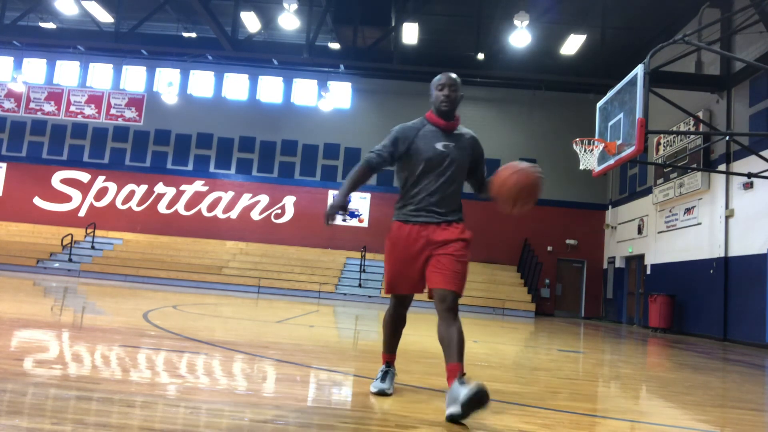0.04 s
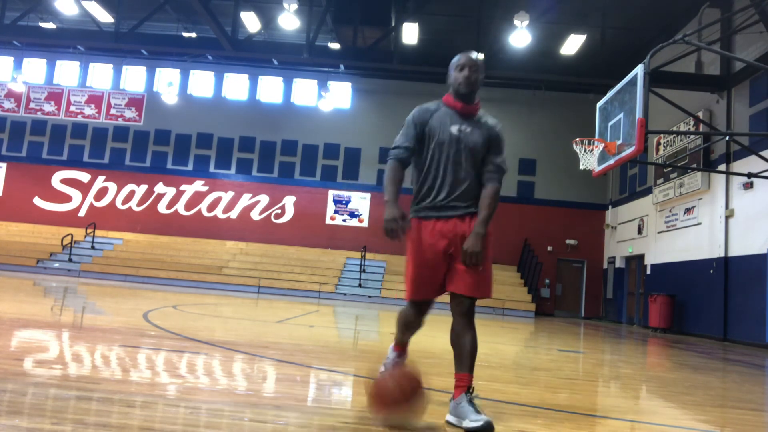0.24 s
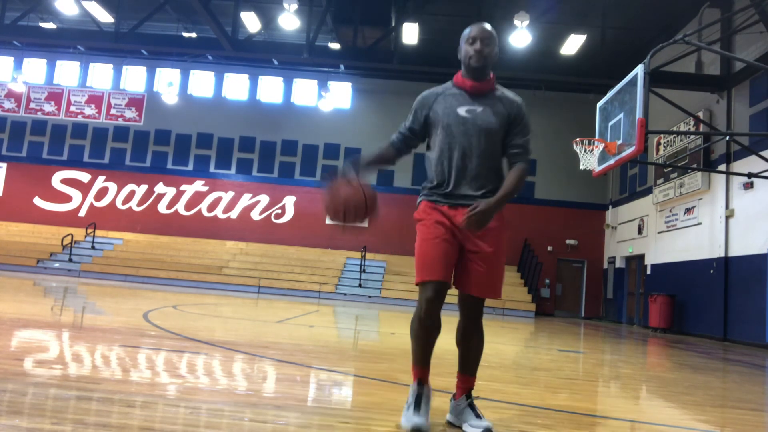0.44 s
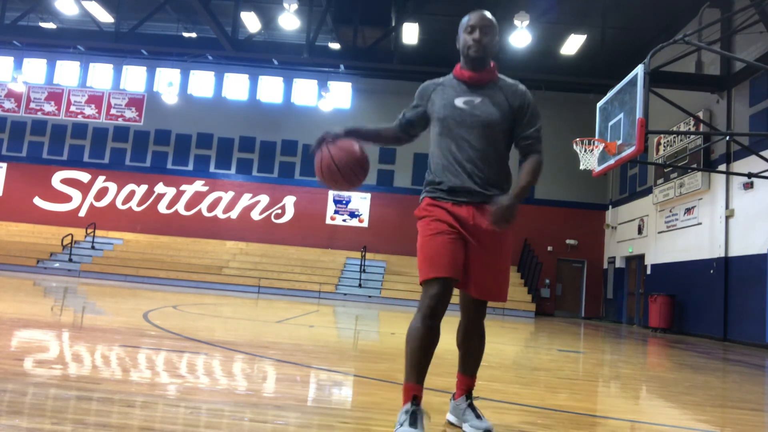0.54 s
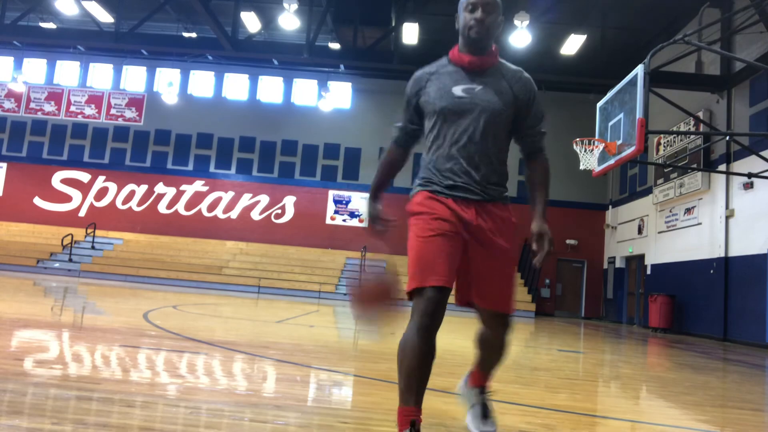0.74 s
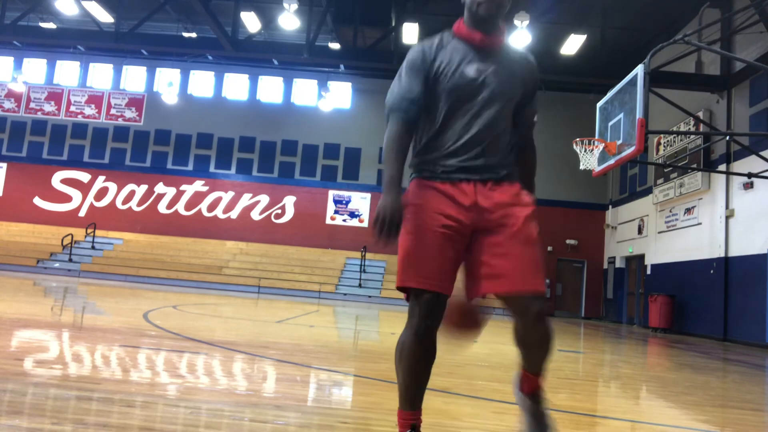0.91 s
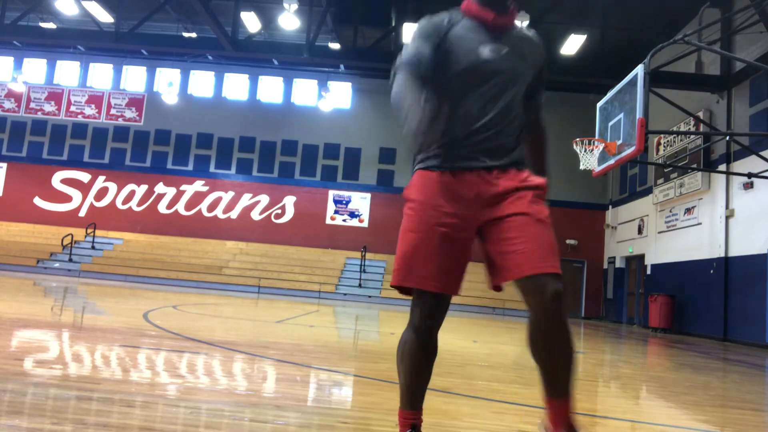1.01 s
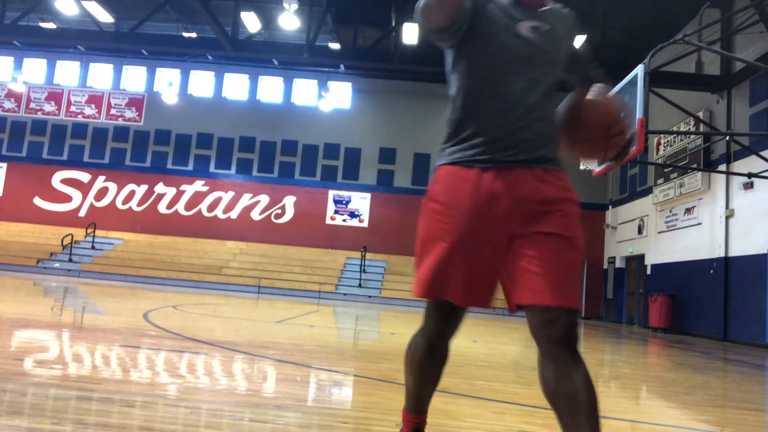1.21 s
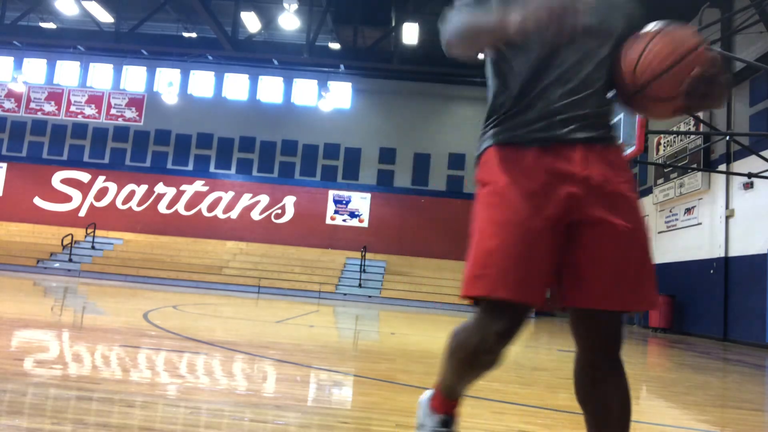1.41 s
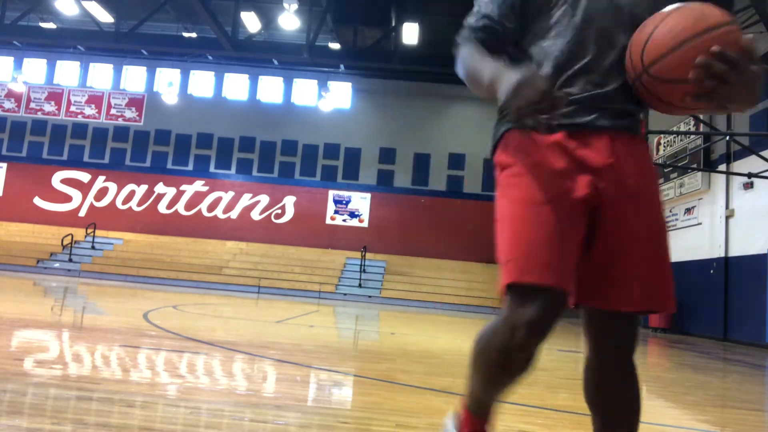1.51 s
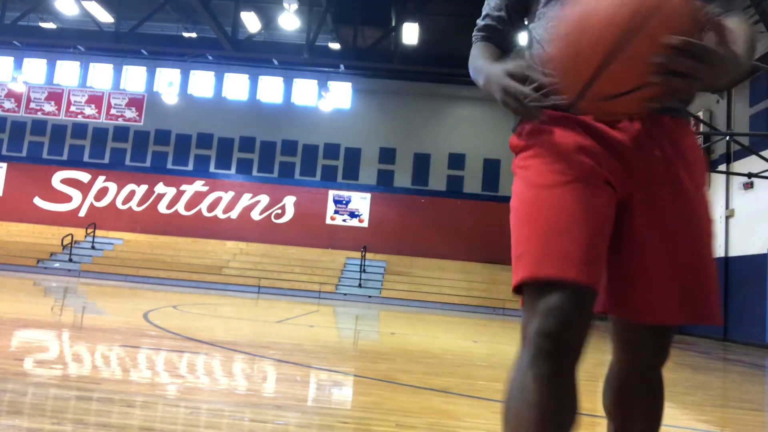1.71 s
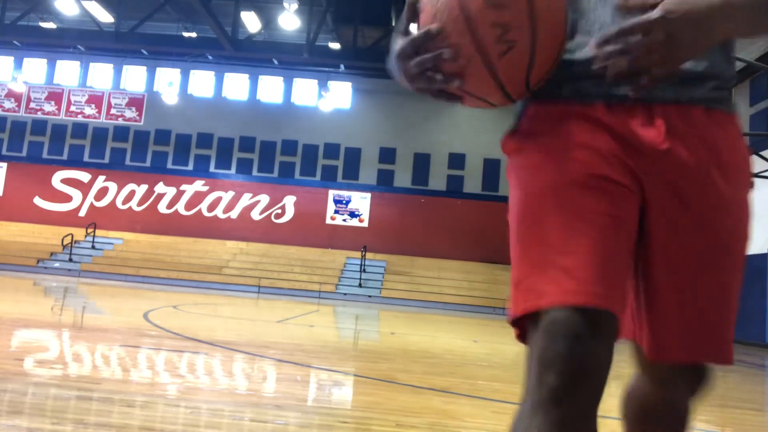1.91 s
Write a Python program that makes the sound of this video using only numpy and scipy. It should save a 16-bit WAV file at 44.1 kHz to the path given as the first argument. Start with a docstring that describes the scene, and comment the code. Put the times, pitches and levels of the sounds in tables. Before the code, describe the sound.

A basketball bounces twice on a wooden gym floor close to the microphone, each slap and thump setting off a brief rattle. The large hall echoes while soft footsteps approach with a faint rustle of clothes.

```python
"""A big gym with a sprung wooden floor; the microphone is on a camera standing on the boards, close
to a basketball. The hall is still ringing from an earlier bounce when the ball lands, at 0.24 s and
again at 0.82 s. Each bounce is a sharp slap of rubber, a falling thump through the floor and a swelling
ring of the boards, and it sets the camera's stand rattling. The hall rings on over its ventilation
while the player walks up with soft steps, rustling clothes and light touches on the ball."""
import sys
import numpy as np
from scipy import signal
from scipy.fft import rfft, irfft, next_fast_len
from scipy.io import wavfile
from scipy.ndimage import map_coordinates

SR = 44100
rng = np.random.default_rng(int(sys.argv[2]) if len(sys.argv) > 2 else 0)


def int16_out(signal):
    """Quantize to a 16-bit WAV file."""
    q = np.round(np.clip(np.atleast_2d(signal).T, -1, 1) * 32767)
    wavfile.write(sys.argv[1], SR, q.astype(np.int16))


N = 85995
T = np.arange(N) / SR

# The ball lands near the microphone. Each row: start in seconds, shell level in dB, shell tilt in dB per
# octave, crack level in dB, crack's upper edge in Hz, then thump, boards and hall levels in dB.
BOUNCES = [(0.239, -1.5, -1.5, -8, 19100, -9.5, -20.5, 4), (0.8161, -8.5, 6.5, -12, 9700, -10.5, -26.5, 1)]
# A bounce heard only as hall sound. It holds: start in seconds, hall level in dB.
EARLIER_BOUNCE = (-0.31, 0)
# The ball's shell, then the faint ping of the air in it. Each row: pitch in Hz, level in dB, T60 in seconds.
SHELL_MODES = [(1062, -15, 0.04), (1239, -3, 0.016), (1720, -12.5, 0.019), (1900, -16, .012),
               (2248, -4, 0.013), (3400, -18, 0.014)]
PING_MODES = [(943, -42, 0.3), (1315, -41.5, .35), (1670, -37.5, 0.25), (2310, -45, .4),
              (2746, -44.5, 0.16)]
# Rubber striking varnish. Each row: frequency in Hz, level in dB.
CRACK_SPECTRUM = [(500, -44), (1000, 13.5), (2300, 6), (2850, -20.5), (3400, 6), (4300, 0), (6500, 1.5),
                  (8500, -6), (13000, -2), (16000, -18.5)]
CLICK_DB, CLICK_DELAY_S, GRIT_T60 = 13, 0.000904, 0.014  # the delay holds at 1 kHz
SCATTER_DB, SCATTER_T60, SCATTER_DULL_HZ, SCATTER_EDGE_HZ = -21, 0.057, 5000, 9500
BODY_ECHO_S, BODY_ECHO_DB, BODY_ECHO_HZ = 0.012, -14.5, 3000

THUMP_END_HZ, THUMP_SWEEP_HZ, THUMP_SWEEP_S = 120.2, 372, 0.00359
BOOM_HZ, BOOM_DB, SAG_HZ, SAG_DB = 78.1, -6, 52.4, -14
# The floorboards' modes, then the noise between them. Each row: frequency in Hz, level in dB.
BOARD_MODES = [(140, 2.5), (237, -0.5), (278, -14), (357, -14.5), (396, -9.5), (467, 0.5), (523, -11.5),
               (574, -2.5), (623, -1), (725, -9.5), (770, -19)]
BOARD_SPECTRUM = [(25, -47.5), (45, -11), (100, -9), (170, -5), (300, -0.5), (420, 1), (620, -4),
                  (850, -14.5), (1200, -32), (3000, -49.5)]
BOARD_RING_DB, BOARD_RING_T60, BOARD_NOISE_DB = -23, 0.9, 1.5

# The stand chatters under the microphone. Each row: start in seconds, ring level in dB, tick level in dB.
RATTLES = [(0.2736, -46, -28.5), (0.2813, -23, -36), (.294, -20.5, -23), (.3058, -11.5, -18.5),
           (0.3177, -18.5, -19), (.331, -24.5, -27.5), (0.3517, -38, -34), (0.8501, -32, -28.5),
           (0.8954, -21, -29)]
# The stand's ring, then its knock on the floor. Each row: pitch in Hz, level in dB, T60 in seconds.
STAND_MODES = [(2496, -1.5, 0.011), (2860, -2, 0.009), (3600, -11.5, 0.0077)]
KNOCK_MODES = [(135, -5.5, 0.056), (251, -6.5, 0.048), (513, -1, 0.021), (602, 1.5, 0.019),
               (780, -5.5, 0.014)]
# The stand drops back on the floor. It holds: start in seconds, knock level in dB, tail level in dB.
KNOCK = (.857, -6, -32.5)
# The stand's hard tick. Each row: frequency in Hz, level in dB.
TICK_SPECTRUM = [(1500, -26), (2500, 11), (4500, -7.5), (7000, 1), (10200, -6)]
TICK_T60, TICK_EDGE_HZ = 0.0046, 10600

# The colour of the hall's reverberation. Each row: frequency in Hz, level in dB.
HALL_SPECTRUM = [(25, -33), (55, 0.5), (90, 7), (140, 6.5), (240, 1.5), (450, -5.5), (820, -16),
                 (1250, -7.5), (1900, -15), (2400, -11), (3050, -23.5), (3600, -18.5), (5000, -26.5),
                 (8000, -28.5), (11000, -48), (16000, -57)]
# How long the hall rings. Each row: frequency in Hz, T60 in seconds.
HALL_DECAY = [(80, 2.6), (200, 2.29), (500, 2.08), (1300, 1.826), (3000, 1.65), (8000, 1.025), (15000, 3.2)]
HALL_DB, HALL_BUILD_S = -34, 0.019

# The player's footfalls. Each row: start in seconds, thud level in dB, pitch in Hz, tail level in dB.
STEPS = [(0.044, -36, 161, -54), (0.609, -34, 130, -40.5), (0.723, -31.5, 76.6, -45.5),
         (1.173, -26, 205, -42.5), (1.189, -28.5, 130.7, -44), (1.301, -35, 75.4, -67),
         (1.559, -49, 91.4, -60), (1.806, -32.5, 184.6, -44), (1.857, -44.5, 400, -46.5)]
# The floor's dull tail after a landing. Each row: frequency in Hz, level in dB.
FLOOR_TAIL_SPECTRUM = [(30, -1.5), (90, -3), (400, -3), (620, -9), (800, -17), (1100, -25), (4000, -48)]
# Fingers and soles tap. Each row: start in seconds, level in dB, pitch in Hz.
TAPS = [(0.404, -43.5, 8000), (0.593, -42, 1270), (.629, -36.5, 1310), (0.694, -44.5, 6940),
        (1.015, -32, 1210), (0.712, -47.5, 6500), (1.167, -46, 3500), (1.184, -36.5, 570),
        (1.722, -50.5, 4680), (1.848, -49, 1745)]
# Clothes and palms brush. Each row: centre and half length in seconds, level in dB, tilt in dB per octave.
SWISHES = [(0.141, 0.0093, -68, -6), (0.424, 0.026, -67, 7), (0.507, 0.012, -62, 6),
           (0.644, 0.013, -57.5, 8), (0.703, 0.022, -56, -13), (1.186, 0.21, -64.5, -5),
           (1.317, 0.05, -59, -4), (1.525, 0.038, -49.5, -6.5), (1.658, 0.045, -69, -4.5),
           (1.783, .06, -64.5, -0.5), (1.95, 0.021, -62.5, -5)]
# Rubbing fabric. Each row: frequency in Hz, level in dB.
CLOTH_SPECTRUM = [(500, -21.5), (2000, -7), (4500, 4), (7500, 6.5), (9500, 2.5), (14000, 6), (16000, -9.5)]
GRAIN_DB, GRAINS_PER_S = 1.5, 220
# The ventilation's room tone. Each row: frequency in Hz, level in dB.
VENT_SPECTRUM = [(20, -38), (60, -1), (100, 6), (170, -15.5), (350, -12), (700, -32.5), (2000, -31.5),
                 (7000, -44.5), (15000, -55)]
VENT_DB, BAND_LIMIT_HZ = -47, 16000


def bounces():
    """The ball lands close to the microphone: slap, thump and ringing boards together."""
    out = np.zeros(N)
    for start, shell_db, tilt_db, crack_db, edge_hz, thump_db, boards_db, _ in BOUNCES:
        contact = slap(shell_db, tilt_db, crack_db, edge_hz)
        out += at(start, contact + amp(thump_db) * thump() + amp(boards_db) * boards())
    return out


def slap(shell_db, tilt_db, crack_db, edge_hz):
    """Rubber meets varnish: a gritty click, the ball's short modes, a faint ping and close reflections."""
    pivot_hz = SHELL_MODES[1][0]
    shell = ring([(hz, db + tilt_db * np.log2(hz / pivot_hz), t60) for hz, db, t60 in SHELL_MODES])
    ball = (shell + ring(PING_MODES)) * rise(0.0002)
    grit = noise(CRACK_SPECTRUM) * decay(GRIT_T60) * rise(0.0002)
    crack = lowpass(amp(CLICK_DB) * click() + grit, edge_hz, order=3)
    # Nearby surfaces return little treble.
    scatter = noise(CRACK_SPECTRUM,
                    lambda hz: below(hz, SCATTER_EDGE_HZ, order=4) * below(hz, SCATTER_DULL_HZ, order=1))
    scatter *= amp(SCATTER_DB) * decay(SCATTER_T60)
    contact = amp(shell_db) * ball + amp(crack_db) * (crack + scatter)
    # The echo off the player's body is dulled by clothing.
    body_echo = lowpass(at(BODY_ECHO_S, contact), BODY_ECHO_HZ, order=2)
    return contact + amp(BODY_ECHO_DB) * body_echo


def click():
    """An impulse of unit energy, smeared in the wood so that its treble runs ahead."""
    def response(hz):
        lag = np.exp(-4j * np.pi * CLICK_DELAY_S * np.sqrt(hz * 1000))
        return amp(along(CRACK_SPECTRUM, hz)) * lag
    smeared = filtered(signal.unit_impulse(N), response)
    return smeared / np.linalg.norm(smeared)


def thump():
    """A bending wave in the floor: its high part reaches the microphone first, the deep boom last."""
    cycles = THUMP_END_HZ * T + THUMP_SWEEP_HZ * THUMP_SWEEP_S * rise(THUMP_SWEEP_S)
    falling = np.cos(2 * np.pi * cycles) * swell(peak_s=0.01, shape=1.05)
    boom = amp(BOOM_DB) * np.cos(2 * np.pi * BOOM_HZ * T)
    sag = amp(SAG_DB) * np.cos(2 * np.pi * SAG_HZ * T)  # the whole floor flexes
    return -falling - (boom + sag) * swell(peak_s=0.047, shape=5)


def boards():
    """The boards ring up as the wave spreads, then fade."""
    modes = unit(sum(amp(db + rng.normal(0, 1)) * np.sin(2 * np.pi * (hz * T + rng.random()))
                     for hz, db in BOARD_MODES))
    bloom = swell(peak_s=0.029, shape=1.62)
    linger = amp(BOARD_RING_DB) * decay(BOARD_RING_T60) * rise(0.01)
    return modes * (bloom + linger) + amp(BOARD_NOISE_DB) * noise(BOARD_SPECTRUM) * bloom


def stand():
    """Right at the microphone, the shaken stand chatters with hard ticks and knocks once on the floor."""
    chatter = np.zeros(N)
    for start, ring_db, tick_db in RATTLES:
        tick = noise(TICK_SPECTRUM) * decay(TICK_T60)
        chatter += at(start, amp(ring_db) * ring(STAND_MODES) + amp(tick_db) * tick)
    knock_s, knock_db, tail_db = KNOCK
    knock = amp(knock_db) * ring(KNOCK_MODES) * rise(0.00052) + amp(tail_db) * floor_tail()
    return lowpass(chatter, TICK_EDGE_HZ, order=10) + at(knock_s, knock)


def hall():
    """Each bounce fills the hall around the microphone; the bass outlasts the midrange."""
    out = np.zeros(N)
    for start, db in [EARLIER_BOUNCE] + [(row[0], row[-1]) for row in BOUNCES]:
        hz, seconds, bands = signal.stft(noise(HALL_SPECTRUM), SR, nperseg=1024)
        fade = np.exp(-np.log(1000) * seconds / along(HALL_DECAY, hz)[:, None])
        _, tail = signal.istft(bands * fade, SR)
        out += at(start, amp(HALL_DB + db) * tail[:N] * rise(HALL_BUILD_S))
    return out


def steps():
    """Each footfall is a soft thud of the floor, peaking after two cycles, with a dull tail."""
    out = np.zeros(N)
    for start, thud_db, hz, tail_db in STEPS:
        thud = np.sin(2 * np.pi * hz * T) * swell(peak_s=2 / hz, shape=2.96)
        out += at(start, amp(thud_db) * thud + amp(tail_db) * floor_tail())
    return out


def floor_tail():
    """The floor sounds on dully after a foot or the stand lands on it."""
    return noise(FLOOR_TAIL_SPECTRUM) * decay(t60=0.48) * rise(0.0011)


def taps():
    """Fingers and soles make short, light contacts, each a band of noise around its own pitch."""
    spectrum = [(300, -12), (1000, 14), (15000, -6.5)]  # Each row: frequency in Hz, level in dB.
    out = np.zeros(N)
    for start, db, pitch in TAPS:
        band = noise(spectrum, lambda hz: 1 / np.hypot(1, 1.7 * (hz / pitch - pitch / (hz + 1))))  # Q 1.7
        out += at(start, amp(db) * band * decay(t60=0.022) * rise(0.0009))
    return out


def clothes():
    """Fabric and skin swish faintly, grainy as the fibres catch and slip."""
    catches = map_coordinates(rng.standard_normal(N // 20), [T * GRAINS_PER_S])
    grain = unit(amp(GRAIN_DB * catches))
    out = np.zeros(N)
    for centre_s, half_s, db, tilt_db in SWISHES:
        stroke = np.exp(-0.5 * ((T - centre_s) / half_s) ** 2)
        out += amp(db) * stroke * noise(CLOTH_SPECTRUM, lambda hz: amp(tilt_db * np.log2(hz + 1)))
    return grain * out


def ventilation():
    """Room tone: the steady low rush of the hall's ventilation."""
    return amp(VENT_DB) * noise(VENT_SPECTRUM)


def amp(db):
    return 10 ** (np.asarray(db) / 20)


def unit(x):
    return x / np.sqrt(np.mean(x ** 2) + 1e-20)


def along(points, hz):
    """A curve through (Hz, value) points on a log frequency axis."""
    knots_hz, values = np.transpose(points)
    return np.interp(np.log(hz + 1), np.log(knots_hz + 1), values)


def filtered(x, response):
    """x through a gain that depends on frequency."""
    size = next_fast_len(N + SR // 2)
    return irfft(rfft(x, size) * response(np.fft.rfftfreq(size, 1 / SR)), size)[:N]


def below(hz, edge_hz, order):
    """Gain of a low-pass."""
    return 1 / np.sqrt(1 + (hz / edge_hz) ** (2 * order))


def lowpass(x, edge_hz, order):
    return filtered(x, lambda hz: below(hz, edge_hz, order))


def noise(spectrum, gain=lambda hz: 1):
    """Coloured noise of rms 1."""
    return unit(filtered(rng.standard_normal(N), lambda hz: amp(along(spectrum, hz)) * gain(hz)))


def decay(t60):
    return np.exp(-np.log(1000) * T / t60)


def rise(attack_s):
    return 1 - np.exp(-T / attack_s)


def swell(peak_s, shape):
    """Grows to 1 at peak_s and dies; a larger shape is narrower."""
    return (T / peak_s * np.exp(1 - T / peak_s)) ** shape


def ring(modes):
    """Damped modes of alternating sign."""
    return sum((-1) ** k * amp(db) * np.sin(2 * np.pi * hz * T) * decay(t60)
               for k, (hz, db, t60) in enumerate(modes))


def at(start_s, x):
    return np.interp(np.arange(N) - round(start_s * SR), np.arange(N), x, left=0, right=0)


def scene():
    """The dribble, the hall and the player at one microphone."""
    return (bounces() + stand() + hall() + steps() + taps() + clothes() + ventilation())[None]


def record(dry):
    """The recorder drops the lowest rumble, rounds off the highest peaks and cuts the top treble."""
    low_cut = signal.sosfilt(signal.butter(2, 28, "high", fs=SR, output="sos"), dry[0])
    limited = low_cut / (1 + np.abs(low_cut / 0.95) ** 8) ** (1 / 8)
    return lowpass(limited, BAND_LIMIT_HZ, order=60)[None]


dry = scene()
out = record(dry)
int16_out(out)
```